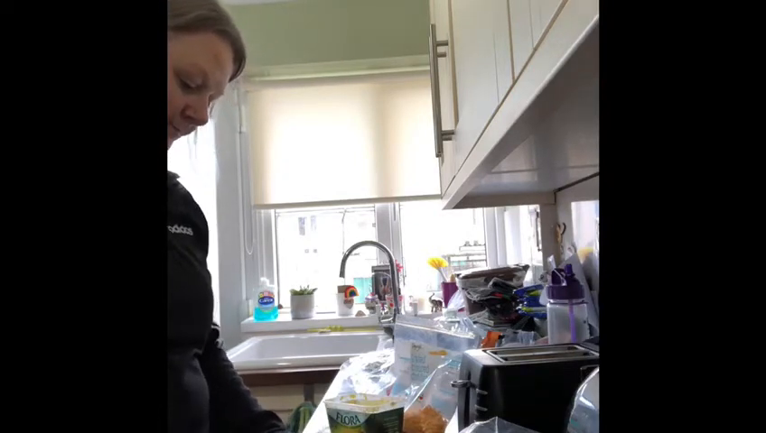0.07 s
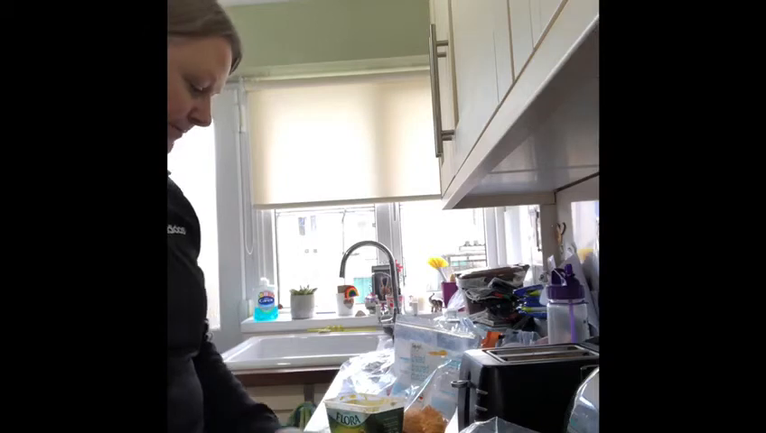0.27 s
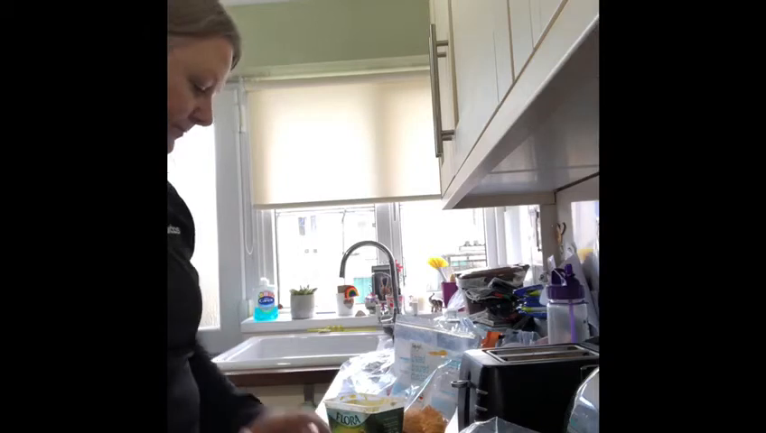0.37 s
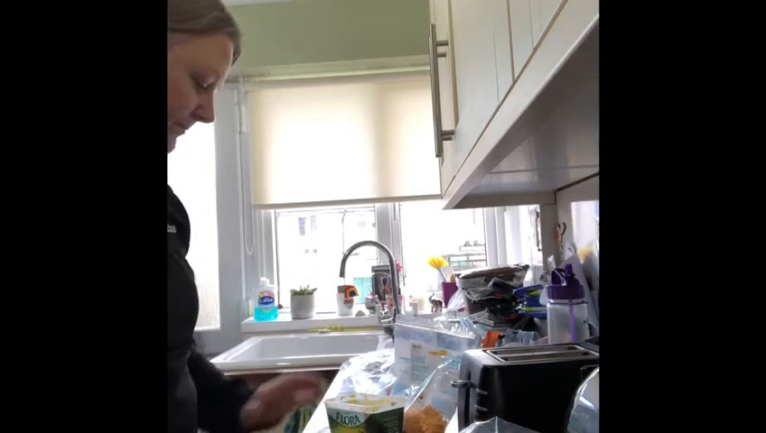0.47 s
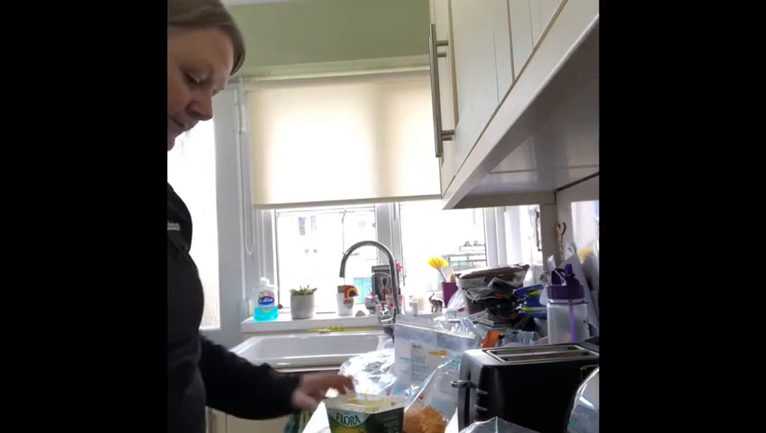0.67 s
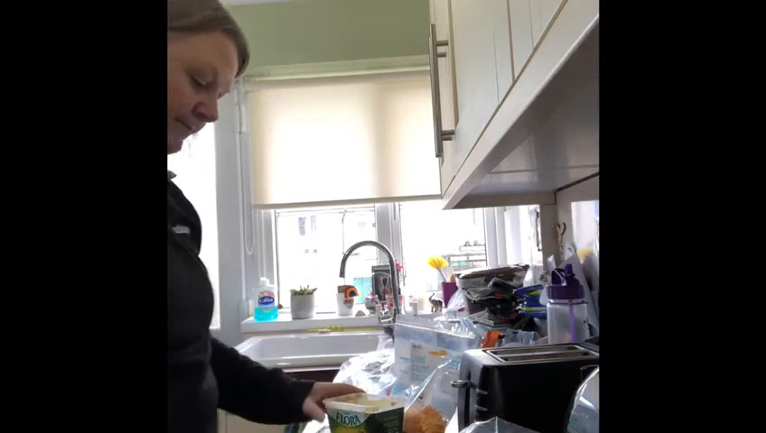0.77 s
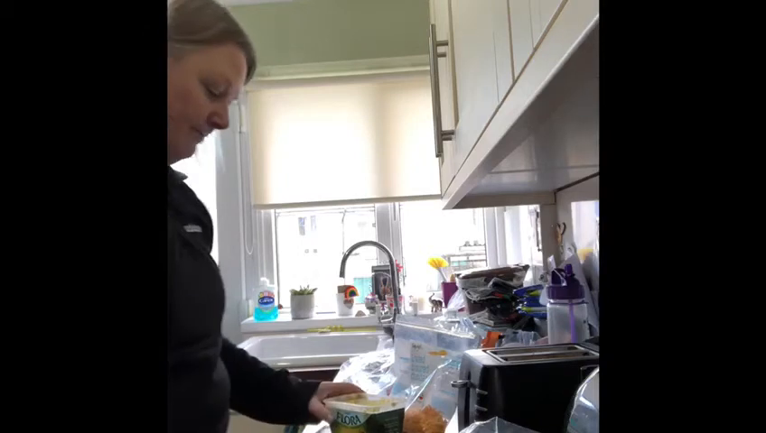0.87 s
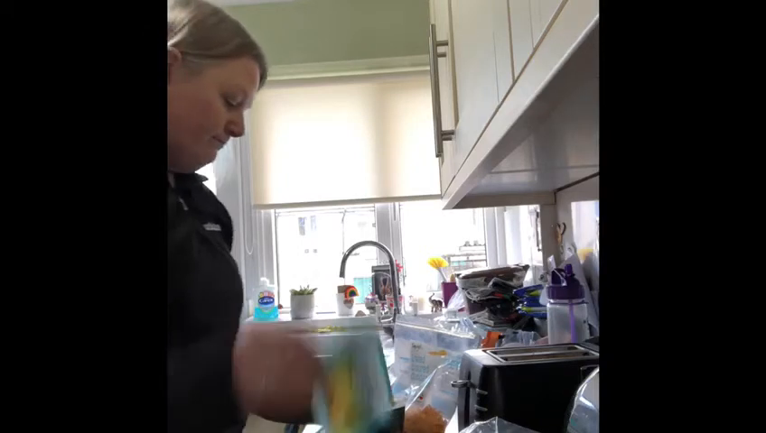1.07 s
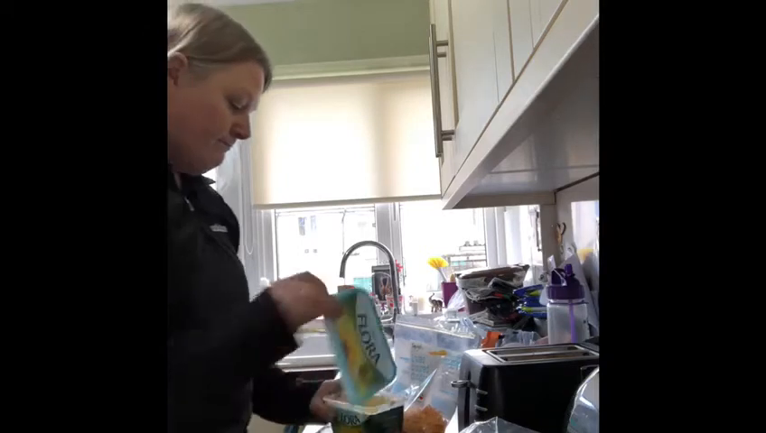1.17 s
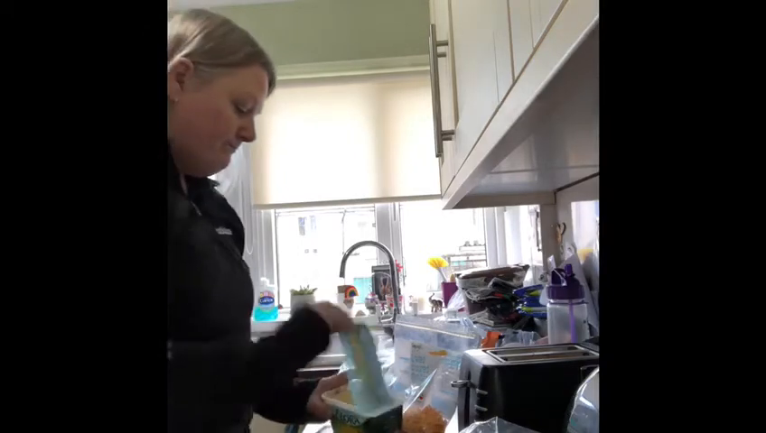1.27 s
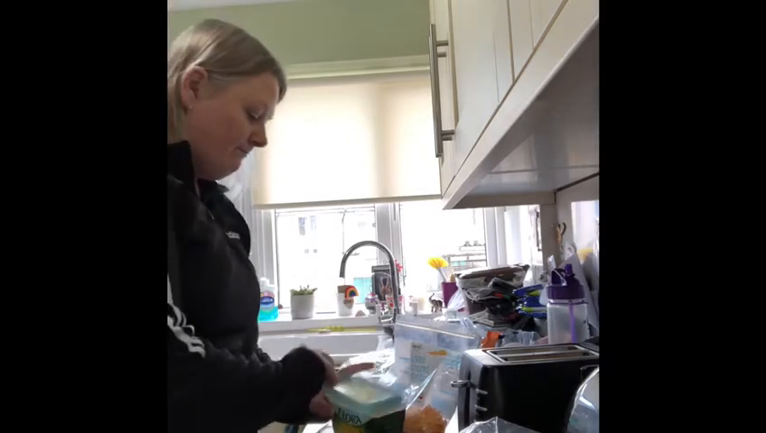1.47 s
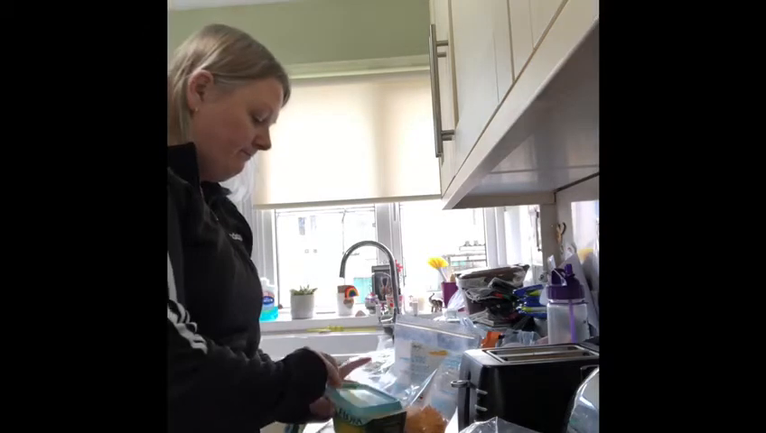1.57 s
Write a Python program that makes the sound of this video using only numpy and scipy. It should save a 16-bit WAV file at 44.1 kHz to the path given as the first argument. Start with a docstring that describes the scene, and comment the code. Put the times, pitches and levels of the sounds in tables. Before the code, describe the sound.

Sharp metallic knife knock on the counter, sleeve swish, plastic lid popped off, short tub scrapes

```python
"""In a small hard kitchen, a table knife is put down on the counter with one sharp, clattering knock.
A jacket sleeve swishes, the plastic lid of a butter tub is prised off and lifted, then laid down.
Then the tub is scraped and nudged in short uneven strokes.
Contacts are clicks and noise bursts driving filters and damped modes; rubbing is dense random slips.
A decaying noise tail rings behind all the handling, over quiet room air."""
import sys
import numpy as np
from scipy import signal
from scipy.fft import rfft, irfft
from scipy.io import wavfile
from scipy.ndimage import uniform_filter1d

SR = 44100
rng = np.random.default_rng(int(sys.argv[2]) if len(sys.argv) > 2 else 0)


def wav_out(sig):
    """Save sig, one row per channel (or a flat mono array), as 16-bit PCM at SR to the path in sys.argv[1]."""
    wavfile.write(sys.argv[1], SR, np.round(np.clip(np.atleast_2d(sig).T, -1, 1) * 32767).astype(np.int16))


N = 74970


def amp(db):
    """Decibels to gain."""
    return 10 ** (np.asarray(db) / 20)


def unit(x):
    """Scale to rms 1."""
    return x / np.sqrt(np.mean(x ** 2))


def clock():
    """Time of each sample in seconds."""
    return np.arange(N) / SR


def fade(t60):
    """Exponential decay from time zero, down 60 dB after t60 seconds."""
    return np.exp(-np.log(1000) * clock() / t60)


def through(x, response):
    """Pass a sound through an impulse response."""
    return signal.fftconvolve(x, response)[:N]


def colour(x, points):
    """Minimum-phase filter of unit energy that follows (pitch_hz, level_db) points."""
    hz, db = np.array(points).T
    f = np.maximum(np.fft.rfftfreq(4096, 1 / SR), 1)
    # roll off beyond the outermost points
    skirts = np.minimum(f / hz[0], 1) ** 2 * np.minimum(hz[-1] / f, 1) ** 2
    gain = amp(np.interp(np.log(f), np.log(hz), db)) * skirts
    # folding the cepstrum puts the response after the blow, never before it
    cepstrum = irfft(np.log(gain))
    half = len(cepstrum) // 2
    cepstrum[1:half] *= 2
    cepstrum[half + 1:] = 0
    response = irfft(np.exp(rfft(cepstrum)))
    return through(x, response / np.linalg.norm(response))


def blows(rows, axis=1):
    """One impulse per row, with the level found in the given column."""
    x = np.zeros(N)
    for row in rows:
        x[int(row[0] * SR)] += amp(row[axis])
    return x


def cracks(rows, t60, axis=1):
    """A click and a quickly dying burst of chatter for each contact."""
    click_share = 0.25  # clean first click against the chatter that follows it
    chatter = np.zeros(N)
    for row in rows:
        start = int(row[0] * SR)
        burst = rng.standard_normal(N) * fade(t60)
        burst = amp(row[axis]) * burst / np.linalg.norm(burst)
        chatter[start:] += burst[:N - start]
    return chatter + click_share * blows(rows, axis=axis)


def ring(x, modes):
    """Damped modes (pitch_hz, level_db, t60_s) of alternating sign, driven by x."""
    response = np.zeros(N)
    for k, (hz, db, t60) in enumerate(modes):
        response += (-1) ** k * amp(db) * fade(t60) * np.sin(2 * np.pi * hz * clock())
    return through(x, response)


def resonate(x, peaks):
    """Broad resonances (pitch_hz, width_hz, level_db) side by side."""
    return sum(amp(db) * signal.lfilter(*signal.iirpeak(hz, hz / width, fs=SR), x)
               for hz, width, db in peaks)


def swell(start, attack, hold, release):
    """Rounded attack, hold and release, all in seconds."""
    corners = start + np.cumsum([0, attack, hold, release])
    return np.sin(np.pi / 2 * np.interp(clock(), corners, [0, 1, 1, 0])) ** 2


def friction(rate, spread_db):
    """Dense slips of uneven size and random sign, rate per second, rms 1."""
    slips = rng.random(N) < rate / SR
    size = amp(spread_db * np.minimum(rng.exponential(size=N), 4))
    return unit(slips * rng.choice([-1, 1], N) * size)


def walk(rate):
    """Smooth random wander that turns about rate times a second; spread near 1."""
    steps = np.interp(clock() * rate, np.arange(N), rng.standard_normal(N))
    return uniform_filter1d(steps, int(SR / rate / 2)) * np.sqrt(2)


def glide(x, hz, width):
    """A steep-sided resonance whose centre moves, rms 1."""
    turn = np.exp(2j * np.pi * np.cumsum(hz) / SR)
    pole = np.exp(-np.pi * width / SR)
    # shift the moving centre to 0 Hz, filter there, shift back
    return unit(np.real(turn * signal.lfilter([1], np.poly([pole, pole]), x / turn)))


# tone of the room air: pitch_hz, level_db (relative)
AIR_TONE = [(30, -21), (253, -8), (317, -8.5), (655, -13.5), (1620, -19), (1970, -18.5), (3100, -23),
            (10600, -31.5), (12000, -35)]


def room_air():
    """Quiet steady air: coloured noise held at a fixed rms level."""
    return amp(-67.5) * unit(colour(rng.standard_normal(N), AIR_TONE))


# modes of the counter: pitch_hz, level_db (relative), t60_s
COUNTER_MODES = [(55.3, -6, 0.25), (122, 3.5, 0.14), (182, -5, .13), (220, 2, 0.04)]


def counter_thud(hits, level_db):
    """The counter's low damped modes, struck by the thud levels in column 3."""
    return amp(level_db) * ring(blows(hits, axis=3), COUNTER_MODES)


# knife contacts, a faint clink, a touch, then the rattling fall:
# start_s, blow_db, blade_ring_db, counter_thud_db (levels relative)
KNIFE_HITS = [(.002, -43.5, -47, -56), (.2378, -22, -32.5, -57.5), (.2486, -4.5, -0.5, -11.5),
              (.2525, 0, -6, -19.5), (.2655, -3.5, -12.5, 3.5), (.272, -2.5, 2.5, 6.5),
              (.2765, -5, -12, -1), (.285, -13.5, -9.5, -13.5), (.315, -19.5, -27, -19)]
# modes of the knife: pitch_hz, level_db (relative), t60_s (before the blade is damped)
KNIFE_MODES = [(420.3, -2, 0.18), (911, -3, 0.18), (962.5, -2, 0.17), (1028.3, 0, 0.12), (1394, -0.5, 0.14),
               (1917, -3.5, 0.1), (2045, -3.5, 0.099), (2440, 4, 0.043), (3077, 3, 0.099),
               (3111, 8.5, 0.07), (4214, -3.5, 0.089), (4485, 0.5, 0.2), (6030, 2, 0.31),
               (7100, -0.5, 0.09), (7606, 0, 0.34), (8560, -5.5, 0.23), (9390, -1.5, 0.16),
               (11280, -6, 0.19)]
# tone of the knife's blow: pitch_hz, level_db (relative)
KNIFE_BLOW_TONE = [(150, -17), (420, -6.5), (600, -5.5), (950, -4.5), (1500, -5.5), (2600, -8), (3200, -6),
                   (4200, -2), (5200, -14), (6050, -1.5), (6600, -19), (7600, -15), (9500, -12.5),
                   (10400, -31), (11500, -18), (12500, -36.5)]


def knife():
    """Handle and blade rattle; contacts feed the steel's unsteady ring until it lies flat; the counter thuds."""
    ring_width_hz, rest_s, rest_t60_s = 7.8, 0.27, 0.12
    blow = amp(4.5) * colour(cracks(KNIFE_HITS, t60=0.088), KNIFE_BLOW_TONE)
    energy = blows(KNIFE_HITS, axis=2) ** 2
    steel = np.zeros(N)
    for hz, db, t60 in KNIFE_MODES:
        # energies of successive contacts add up; random phase drift widens each mode
        envelope = np.sqrt(np.abs(through(energy, fade(t60) ** 2)))
        wander = np.cumsum(rng.standard_normal(N)) * np.sqrt(2 * np.pi * ring_width_hz / SR)
        steel += amp(db) * envelope * np.sin(2 * np.pi * hz * clock() + wander)
    # extra decay once the knife lies flat
    damping = amp(-60 * np.maximum(clock() - rest_s, 0) / rest_t60_s)
    return blow + amp(-29.5) * damping * steel + counter_thud(KNIFE_HITS, level_db=-44.5)


# standing wave of the room: pitch_hz, level_db, t60_s
ROOM_MODES = [(224, -64, 0.89)]


def kitchen(x):
    """Dense reflections from tiles and cupboards, the treble dying sooner, and a lingering low boom."""
    t60_s, treble_t60_s, onset_s = 0.37, 0.28, 0.0084
    noise = rng.standard_normal(N)
    low = signal.sosfilt(signal.butter(1, 2500, fs=SR, output="sos"), noise)
    tail = low * fade(t60_s) + (noise - low) * fade(treble_t60_s)
    # silent for half the onset time, then rising to full over one onset time
    tail = tail * np.clip(clock() / onset_s - .5, 0, 1)
    return x + amp(-11.5) * through(x, tail / np.linalg.norm(tail)) + ring(x, ROOM_MODES)


# sleeve swishes: start_s, attack_s, hold_s, release_s, level_db
SWISHES = [(0.38, 0.053, 0.025, 0.15, -65), (0.613, 0.029, 0.0062, 0.064, -58.5),
           (0.773, 0.16, 0.081, 0.21, -47)]
# tone of the cloth: pitch_hz, level_db (relative)
CLOTH_TONE = [(100, -27), (141, -4), (272, -31), (450, -6), (698, -17.5), (900, -3.5), (1200, -6.5),
              (1800, -11), (2320, -3), (2650, -8), (3470, -1.5), (5280, -5), (7000, -8.5), (9500, -12.5),
              (10400, -21)]
# hollow resonances in the long swish of the lift: pitch_hz (centre of drift), width_hz, level_db (relative)
SLEEVE_HOLLOW = [(415, 70, -5), (515, 89, -5), (1200, 56, -3), (3490, 260, -2.5), (4700, 140, -3),
                 (5380, 690, 2.5)]


def sleeve():
    """Cloth slides as the arm draws back, reaches and lifts; folds flutter the hiss and drift the resonances."""
    folds_hz, folds_db, drift = 30, .8, .02  # drift is a fraction of the pitch
    slide = sum(amp(db) * swell(*shape) for *shape, db in SWISHES)
    cloth = colour(friction(10000, spread_db=1.0), CLOTH_TONE) * amp(folds_db * walk(folds_hz))
    hollow = np.zeros(N)
    for hz, width, db in SLEEVE_HOLLOW:
        centre_hz = hz * (1 + drift * walk(folds_hz))
        hollow += amp(db) * glide(rng.standard_normal(N), centre_hz, width)
    lift = swell(start=0.868, attack=.13, hold=0.025, release=0.14)
    return slide * cloth + amp(-53) * lift * hollow


# snaps of the lid's rim: start_s, rim_db, tub_db, counter_thud_db (levels relative)
SNAPS = [(.7146, -19.5, -39, -3), (.7342, 1, 6, 9), (.744, -2.5, -3, -16), (.7775, -4.5, -9, 7),
         (.791, -10, -28, 6), (.8047, 0, 6.5, -9), (.8207, -4, -18, -23)]
# tone of the rim: pitch_hz, level_db (relative)
RIM_TONE = [(100, -8), (180, -10), (450, -17), (900, -12), (1250, -1.5), (1500, 3), (1750, -11), (2150, 3),
            (2600, -11), (4500, -13.5), (7500, -9.5), (10500, -17), (12000, -31)]
# rim dragging off: start_s, attack_s, hold_s, release_s
PEEL = (0.735, 0.008, 0.078, 0.022)
# resonances of the closed tub: pitch_hz, width_hz, level_db (relative)
CLOSED_TUB = [(178, 31, -6), (1285, 72, 7.5), (2060, 93, -26)]
# dull resonances under the fingers: pitch_hz, width_hz, level_db (relative)
GRIP_BODY = [(62, 23, -1), (171, 82, 4), (570, 280, -8)]
GRAINS_PER_S = 2200


def lid_off():
    """Fingers grip the tub; the rim drags and snaps over its lip, sounding the tub and the counter."""
    drag = amp(-48) * swell(*PEEL) * friction(GRAINS_PER_S, spread_db=2.5)
    rim = colour(amp(-14) * cracks(SNAPS, t60=0.021) + drag, RIM_TONE)
    tub = resonate(amp(-5) * blows(SNAPS, axis=2) + amp(-3) * drag, CLOSED_TUB)
    fingers = unit(resonate(friction(GRAINS_PER_S, spread_db=4.0), GRIP_BODY))
    grip = amp(-49) * swell(start=.714, attack=0.013, hold=0.021, release=0.072) * fingers
    return rim + tub + grip + counter_thud(SNAPS, level_db=-65.5)


# tone of a hard plastic edge: pitch_hz, level_db (relative)
EDGE_TONE = [(590, -46), (1000, -16), (3780, -9.5), (4700, 2.5), (5900, 1.5), (6400, -16), (7840, -6),
             (8600, -25), (10800, -9.5), (12000, -36)]


def edge_ticks(hits, axis):
    """A hard plastic edge ticks: very short chatter, brightly coloured."""
    return amp(-9) * colour(cracks(hits, t60=0.016, axis=axis), EDGE_TONE)


# lid landing: start_s, body_db, edge_tick_db, counter_thud_db (these relative), rim_ping_hz, rim_ping_db
LID_HITS = [(1.2247, -1, -12, -6, 3780, -28), (1.231, -3, -30, -1, 3890, -29),
            (1.242, -10.5, 3, -27, 4540, -20), (1.2485, -25, -2, -15, 4820, -28)]
# tone of the lid's body: pitch_hz, level_db (relative)
LID_TONE = [(100, -12), (230, -6), (490, -4), (780, -8), (1300, -21), (1560, -18), (1860, -3.5),
            (2250, -23), (2700, -9.5), (4600, -5.5), (7000, -7.5), (10000, -18.5), (12000, -21.5)]
# modes of the lid: pitch_hz, level_db (relative), t60_s
LID_MODES = [(216, -4, 0.1), (512, 0, 0.14), (1257, 7.5, 0.023), (1790, 4.5, 0.1)]


def lid_down():
    """The lid lands on one side, then slaps its edge down; the rim's ping pitch depends on where it is struck."""
    body = amp(-6) * colour(cracks(LID_HITS, t60=0.16), LID_TONE)
    hum = amp(-43.5) * ring(blows(LID_HITS), LID_MODES)
    pings = sum(ring(blows([(start, db)]), [(hz, 0, .022)]) for start, *_, hz, db in LID_HITS)
    return body + hum + edge_ticks(LID_HITS, axis=2) + pings + counter_thud(LID_HITS, level_db=-52)


# scraping strokes: start_s, attack_s, hold_s, release_s, rub_db, hollow_db, hiss_db (levels relative)
STROKES = [(1.354, 0.004, 0.01, 0.07, -54, -46, -52.5), (1.4, 0.013, 0.0077, 0.03, -59.5, -44, -49),
           (1.435, 0.0032, 0.0095, 0.072, -47.5, -44, -50), (1.516, 0.015, 0.012, 0.023, -54.5, -41.5, -54),
           (1.545, 0.016, 0.011, 0.023, -44, -38, -45.5), (1.578, 0.013, 0.02, 0.054, -47.5, -49.5, -58),
           (1.639, 0.012, 0.0044, 0.043, -54, -49.5, -51.5)]
# tone of the rubbed plastic: pitch_hz, level_db (relative)
SCRAPE_TONE = [(150, -13.5), (260, -1), (400, -4.5), (520, 4.5), (720, 1), (1020, 3), (1200, 1.5),
               (1420, -36), (1780, -5), (2400, -26)]
# tone of the dry crackle: pitch_hz, level_db (relative)
CRACKLE_TONE = [(1500, -0.5), (2800, -0.5), (4800, 0), (6500, -1), (9000, -9), (12000, -20)]
# catches of the plastic edge: start_s, tick_db, hollow_tap_db (levels relative)
CATCHES = [(1.3135, -18, -14), (1.363, -20, -13), (1.4135, -10, -19), (1.4165, -10.5, -17.5),
           (1.44, -19, -11.5), (1.536, -27, -15), (1.6575, -10, -15.5)]
# resonances of the open tub: pitch_hz, width_hz, level_db (relative)
OPEN_TUB = [(676, 22, 7.5), (932, 66, 10), (1043, 69, 11.5), (1173, 34, 9), (1654, 62, 1)]
# resonance of the plastic wall, which moves with the point of contact: time_s, pitch_hz
WALL_PITCH = [(1.365, 870), (1.40, 960), (1.45, 940), (1.555, 1010), (1.579, 684), (1.62, 600),
              (1.649, 950)]
# soft bumps of the tub on the counter: start_s, level_db (relative)
BUMPS = [(1.326, -6), (1.365, 1), (1.44, -10)]
SLIPS_PER_S = 1800


def scraping():
    """Stick and slip under uneven pressure sound the tub and its flexing wall, with crackle, catches and bumps."""
    pressure = unit(amp(1.0 * walk(140)))  # wanders by about 1 dB, 140 turns a second
    rub, hollow, hiss = (pressure * sum(amp(row[k]) * swell(*row[:4]) for row in STROKES)
                         for k in (4, 5, 6))
    plastic = colour(rub * friction(SLIPS_PER_S, spread_db=0.5), SCRAPE_TONE)
    # the same slips excite the tub and its wall
    slips = friction(SLIPS_PER_S, spread_db=0.5)
    tub = resonate(amp(-4.5) * hollow * slips + blows(CATCHES, axis=2), OPEN_TUB)
    wall_hz = np.interp(clock(), *np.array(WALL_PITCH).T)
    wall = amp(-5.5) * hollow * glide(slips, wall_hz, width=110)
    crackle = colour(hiss * friction(2000, spread_db=1.5), CRACKLE_TONE)
    bumps = ring(blows(BUMPS), [(157, -46.5, 0.08)])  # pitch_hz, level_db, t60_s
    return plastic + tub + wall + crackle + edge_ticks(CATCHES, axis=1) + bumps


def scene():
    """All the handling in the kitchen, over quiet room air."""
    handling = knife() + sleeve() + lid_off() + lid_down() + scraping()
    return (kitchen(handling) + room_air())[None]


def record(dry):
    """A very steep low-pass cuts the top of the treble."""
    top_hz = 11950
    return signal.sosfilt(signal.ellip(10, .2, 80, top_hz, fs=SR, output="sos"), dry)


dry = scene()
out = record(dry)
wav_out(out)
```